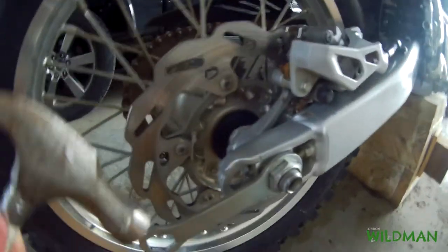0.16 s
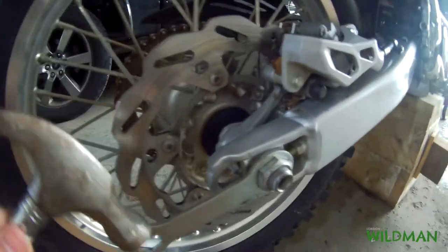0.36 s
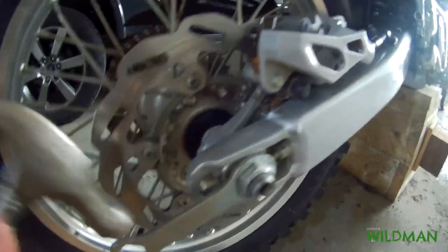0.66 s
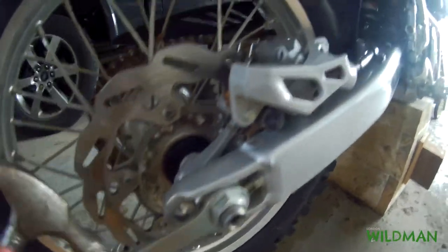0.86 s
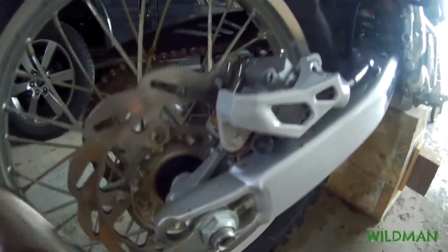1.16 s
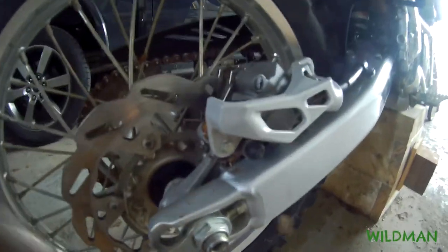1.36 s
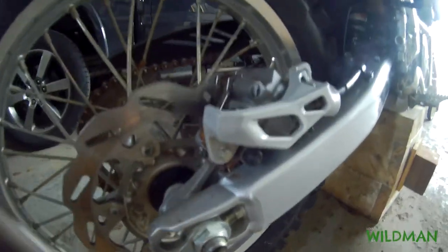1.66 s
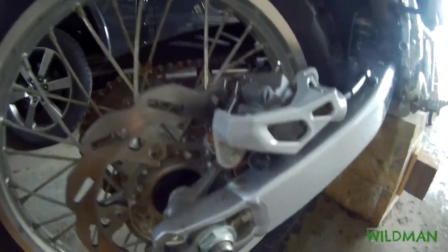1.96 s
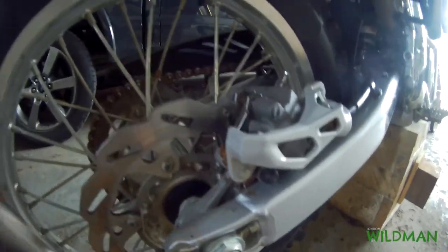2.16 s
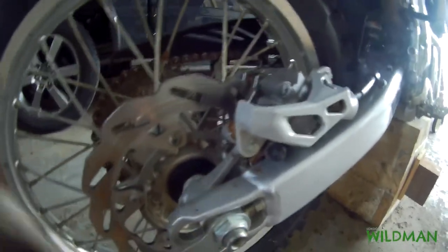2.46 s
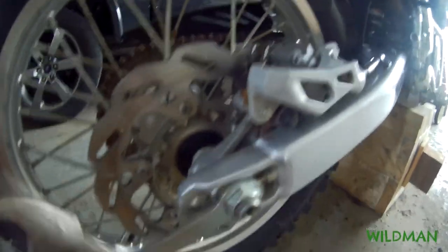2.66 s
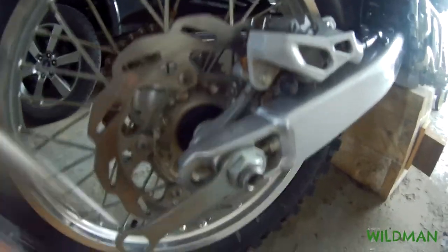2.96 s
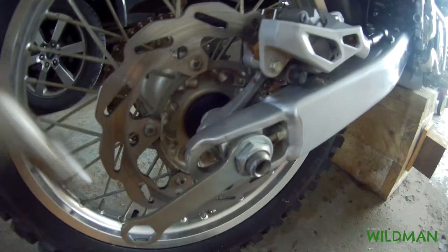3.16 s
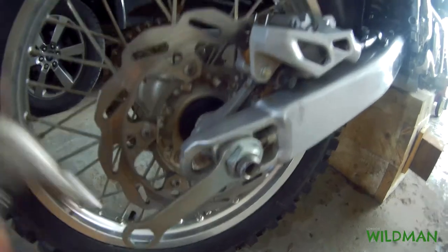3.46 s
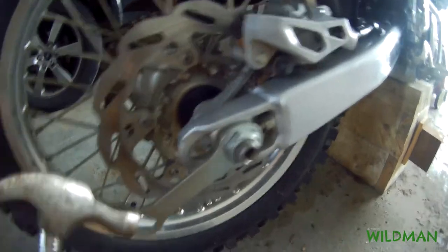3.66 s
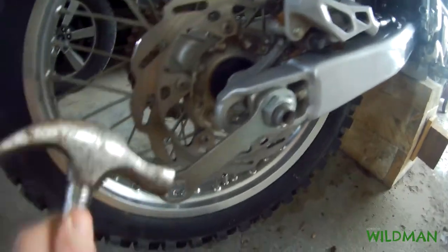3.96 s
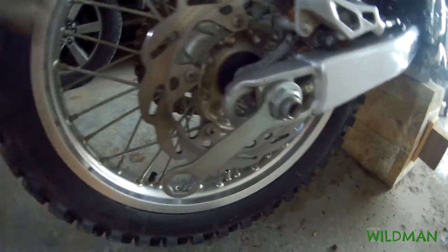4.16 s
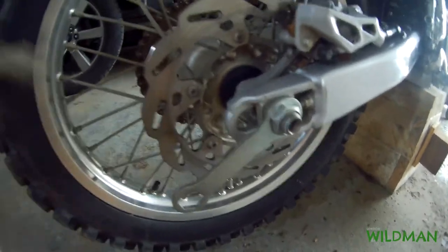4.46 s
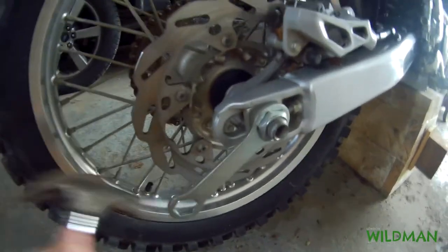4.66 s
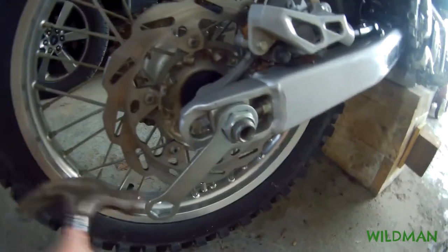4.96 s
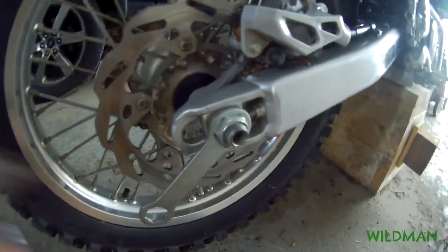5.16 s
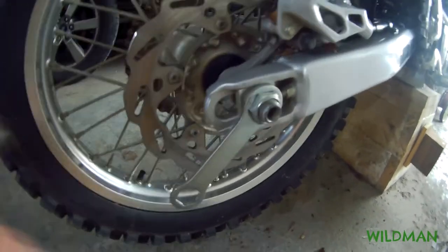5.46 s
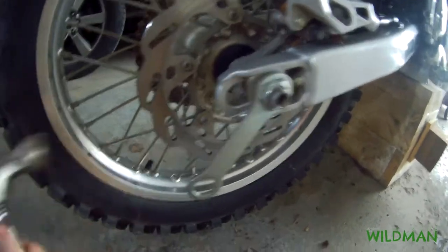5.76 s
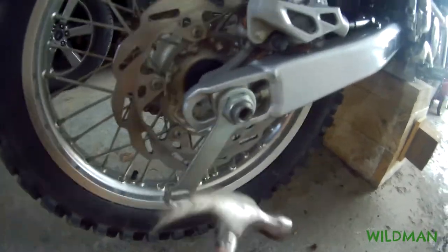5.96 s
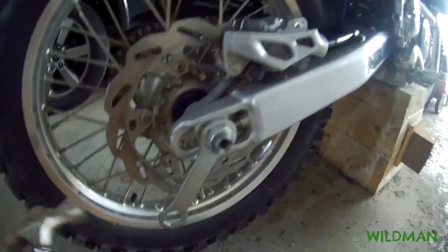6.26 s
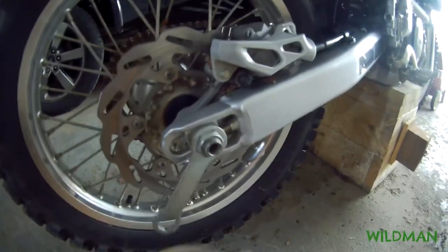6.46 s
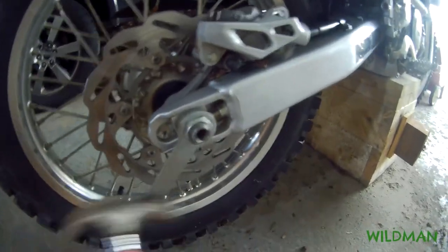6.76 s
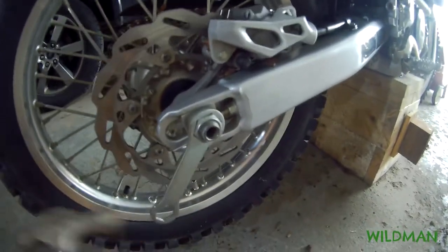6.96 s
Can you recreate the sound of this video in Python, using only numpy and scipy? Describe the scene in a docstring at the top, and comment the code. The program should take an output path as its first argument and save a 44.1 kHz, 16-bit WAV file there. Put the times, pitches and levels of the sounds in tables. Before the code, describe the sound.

In a quiet garage, very close to the microphone, a hammer gives a few light taps, then pounds a motorcycle axle about three times a second. Each blow is a bright steel ping and hard crack with a low thud and short room ring, the loud attacks flattened. Near the end a duller blow frees the axle, followed by two weaker hits, loose steel chinking and a brief rub.

```python
"""A garage, heard close to the work: a hammer drives the rear axle out of a motorcycle.
Each blow is a short steel ping of decaying sines, then a crack of noise through the resonances of
axle, wheel and swingarm, then a knock, a low thud, the ringing frame and the room's noise tail.
Loose steel chinks now and then, mostly near the end, where the axle also slides in its bore.
A faint hush and whine lie beneath; a slow gain control ducks loud attacks and a ceiling flattens them."""
import sys
import numpy as np
from scipy import signal
from scipy.fft import irfft
from scipy.io import wavfile

SR = 44100
rng = np.random.default_rng(int(sys.argv[2]) if len(sys.argv) > 2 else 0)


def log_audio(samples):
    """Write samples as a 16-bit WAV file to the path given in sys.argv[1]."""
    # one column per channel
    frames = np.atleast_2d(samples).T
    # limit to full scale, then quantise
    limited = np.clip(frames, -1, 1)
    pcm = np.round(limited * 32767).astype(np.int16)
    wavfile.write(sys.argv[1], SR, pcm)


N = 312713  # length in samples
AGE = np.arange(32768) / SR  # seconds since a sound began
BINS = np.fft.rfftfreq(8192, 1 / SR)  # Hz, the grid for all filter curves


def amp(db):
    """Turns dB into an amplitude factor."""
    return 10 ** (np.asarray(db) / 20)


def unit(x):
    """Scales to rms 1."""
    return x / np.sqrt(np.mean(x ** 2) + 1e-20)


def read(points, hz):
    """Joins (Hz, value) points on a log-frequency axis."""
    point_hz, value = np.transpose(points)
    return np.interp(np.log(hz + 1), np.log(point_hz + 1), value)


def add(mix, start_s, sound):
    """Adds a sound to the mix at its start time."""
    part = mix[round(start_s * SR):][:len(sound)]
    part += sound[:len(part)]


def dying(t, t60_s):
    """Falls by 60 dB in t60_s seconds."""
    return np.exp(-np.log(1000) * t / t60_s)


def colour(x, gain):
    """Causal (minimum-phase) filter with the given gain at BINS."""
    log_gain = np.log(np.r_[gain, gain[-2:0:-1]] + 1e-6)
    taps = np.fft.ifft(np.exp(np.conj(signal.hilbert(log_gain)))).real
    return signal.fftconvolve(x, taps[:len(gain) // 2])[:len(x)]


def ring(modes):
    """Sums decaying sines from rows (pitch_hz, level_db, t60_s)."""
    return sum(amp(level_db) * dying(AGE, t60_s) * np.sin(2 * np.pi * pitch_hz * AGE)
               for pitch_hz, level_db, t60_s in modes)


# spectrum of the quiet background, with a low rumble near 150 Hz: pitch_hz [Hz], level_db [dB, relative]
HUSH_COLOUR = [(25, 0), (60, 0), (150, 3), (240, 0), (350, -7), (780, -4), (1300, -12), (2500, -21),
               (6000, -23), (10000, -21), (16000, -25)]
# faint electronic whine: pitch_hz [Hz], level_db [dB, peak]
WHINE_TONES = [(6850, -72), (13720, -70)]
HUSH_DB = -53.5  # rms


def hush():
    """A quiet background of shaped steady noise with a low rumble, and a thin electronic whine of pure tones."""
    t = np.arange(N) / SR
    whine = sum(amp(level_db) * np.sin(2 * np.pi * pitch_hz * t) for pitch_hz, level_db in WHINE_TONES)
    air = unit(colour(rng.standard_normal(N), amp(read(HUSH_COLOUR, BINS))))
    return amp(HUSH_DB) * air + whine


# how fast the garage dies away: pitch_hz [Hz], t60_s [s]
ROOM_DECAY = [(100, .6), (800, .56), (2000, .52), (4200, .51), (7000, .48), (9500, .43), (12000, .37),
              (16000, .34)]


def room_tail(sustain, build_s=0.0029):
    """Lets a steady sound die away as the garage does, treble first, after a quick build-up."""
    hz, t, bands = signal.stft(sustain, SR, nperseg=256)
    decay = dying(t, read(ROOM_DECAY, hz)[:, None])
    tail = signal.istft(bands * decay, SR)[1][:len(AGE)]
    return tail * (1 - np.exp(-AGE / build_s))


# broad resonances of the bike: pitch_hz [Hz], width_hz [Hz, before narrowing], level_db [dB, relative]
BODY_RESONANCES = [(243, 143, -9), (638, 125, -1.5), (783, 92, 4.5), (1004, 136, 0.5), (1660, 280, -8),
                   (2254, 370, -3.5), (3360, 220, -5), (4070, 330, 0), (4260, 570, 0.5), (4570, 650, -0.5),
                   (5820, 870, 0), (6780, 230, 5.5), (7570, 770, 1), (9226, 254, 7.5), (9600, 550, 6),
                   (11240, 1200, -2.5), (12700, 520, -9), (14300, 1200, -3)]


def body_gain(hollow_hz=3480, hollow_width_hz=190, hollow_db=-6):
    """Broad peaks of axle, wheel and swingarm as one gain curve; a narrow hollow dips the sound near 3.5 kHz."""
    power = 0
    for pitch_hz, width_hz, level_db in BODY_RESONANCES:
        offset = (BINS - pitch_hz) / (0.96 * width_hz)
        power = power + amp(level_db) ** 2 / (1 + offset ** 2) ** 1.42
    hollow = amp(hollow_db * np.exp(-((BINS - hollow_hz) / hollow_width_hz) ** 2))
    return unit(np.sqrt(power) * hollow)


# the axle slides a little in its bore: time_s [s], level_db [dB, rms of the rub at that moment]
SLIDE_LEVEL = [(6.55, -49), (6.62, -39), (6.695, -37), (6.73, -57), (6.8, -55)]


def slide():
    """Friction noise in the bore stirs the same resonances as the blows."""
    time_s, level_db = np.transpose(SLIDE_LEVEL)
    level = amp(np.interp(np.arange(N) / SR, time_s, level_db, left=-120, right=-120))
    rub_db = read([(200, 11), (600, 5), (930, 9.5), (1300, 10), (4200, -8.5), (9000, -3.5), (14000, 2.5)],
                  BINS)
    return level * unit(colour(rng.standard_normal(N), body_gain() * amp(rub_db)))


# modes of the loose steel: pitch_hz [Hz], level_db [dB, relative], t60_s [s, until it is damped]
STEEL_MODES = [(4829, -6, .2), (8005, -1, .2), (9570, -3, .12), (11050, -1, .15), (13310, -7, .15),
               (14390, -9, .15)]


def chink(level_db, held_s, centre_hz, spread_hz=900, room_db=-45, linger_db=-39):
    """A loose steel piece rings in the air until its next contact damps it; a faint note lingers."""
    modes = []
    for pitch_hz, mode_db, t60_s in STEEL_MODES:
        # modes far from the centre of the ring are weaker
        weight_db = -19 * (1 - np.exp(-((pitch_hz - centre_hz) / spread_hz) ** 2))
        modes.append((pitch_hz, mode_db + weight_db, t60_s))
    tick = amp(-10) * rng.standard_normal(len(AGE)) * dying(AGE, 0.015)
    damping = dying(np.maximum(AGE - held_s, 0), 0.013)
    direct = (ring(modes) + tick) * damping
    linger = ring([(pitch_hz, mode_db, .45) for pitch_hz, mode_db, _ in STEEL_MODES])
    echoes = signal.fftconvolve(direct, room_tail(rng.standard_normal(len(AGE))))[:len(AGE)]
    return amp(level_db) * (direct + amp(linger_db) * linger + amp(room_db) * echoes)


def small_modes(pitches_hz, spread_db=5):
    """The many small parts ring at their own pitches; each blow wakes a different few."""
    size = amp(spread_db * rng.standard_normal(len(pitches_hz)))
    phase = np.exp(2j * np.pi * rng.random(len(pitches_hz)))
    spectrum = np.zeros(len(AGE) // 2 + 1, complex)
    spectrum[(pitches_hz * len(AGE) / SR).astype(int)] = size * phase
    return unit(irfft(spectrum))


def ripple(depth_db=1.5, size=61):
    """No two blows land alike: each favours some resonances over their neighbours."""
    smooth = np.convolve(rng.standard_normal(len(BINS)), np.hanning(size), "same")
    return amp(depth_db * unit(smooth))


# tilt of the blow that frees the axle, lower and duller: pitch_hz [Hz], level_db [dB of change]
FREED_COLOUR = [(800, 2), (2200, 3), (3300, 9), (4300, 5), (4900, 0), (9300, -3)]
FREE_S = 5.96  # the blow that breaks the axle free
WHEEL_DB, AXLE_DB, TREBLE_DB = 0.6, -0.04, -0.5  # added to the shake for each part
GLANCING_ARM_DB = 2.5  # the sideways share of a blow rattles the swingarm


def parts_gain(start_s, aim, shake_db):
    """Shares a blow between wheel (low), swingarm (middle), axle (high) and the treble of the steel."""
    wheel_db, axle_db, treble_db = shake_db + WHEEL_DB, shake_db + AXLE_DB, shake_db + TREBLE_DB
    arm_db = shake_db + GLANCING_ARM_DB * (1 - aim)
    parts_db = read([(700, wheel_db), (1100, wheel_db), (1600, arm_db), (2700, arm_db),
                     (3200, axle_db), (4350, axle_db), (4900, 0), (7800, 0),
                     (9300, treble_db), (12000, 0)], BINS)
    breaks_free = abs(start_s - FREE_S) < .1
    return amp(parts_db + breaks_free * read(FREED_COLOUR, BINS))


# first ping of steel on steel: ratio [multiple of its pitch], level_db [dB, relative],
# t60_s [s, at 0 dB force]
PING_MODES = [(1, -1.5, 0.03), (1.035, -23, 0.02), (.745, -22.5, 0.035)]
GLANCING_PING_HZ, CENTRED_PING_HZ = 9926, 9108  # a well aimed blow pings lower
GLANCING_PING_DB, CENTRED_PING_DB = -8.5, 13  # and louder


def ping(force_db, aim):
    """Steel meets steel: aim sets the pitch and level, and a light tap rings shorter."""
    ping_hz = GLANCING_PING_HZ + aim * (CENTRED_PING_HZ - GLANCING_PING_HZ)
    ping_db = GLANCING_PING_DB + aim * (CENTRED_PING_DB - GLANCING_PING_DB)
    shorter = amp(0.15 * force_db)
    return amp(ping_db) * ring([(ping_hz * ratio, level_db, t60_s * shorter)
                                for ratio, level_db, t60_s in PING_MODES])


# colour of the direct crack against that of the room: pitch_hz [Hz], level_db [dB]
CRACK_COLOUR = [(60, -11), (300, 1), (800, -7.5), (1400, -3.5), (4200, -2.5), (7000, 0), (9500, 0.5),
                (12400, 1.5), (13400, -24.5), (16000, -17.5)]


def crack(force_db, jolt_s):
    """A noise burst, weak until the axle takes up its play, then dying faster for light blows."""
    swell = np.where(AGE < jolt_s, .3, 1) * dying(np.maximum(AGE - jolt_s, 0), 0.051 * amp(0.36 * force_db))
    # loose parts fall back into place with a few small ticks, the later the weaker
    for late_s in rng.uniform(0.015, 0.04, size=3):
        tick = (AGE > late_s) * dying(abs(AGE - late_s), 0.025) * dying(late_s, 0.16)
        swell = swell + amp(-12.5 + .4 * force_db) * tick
    return colour(rng.standard_normal(len(AGE)) * swell, amp(read(CRACK_COLOUR, BINS)))


# slow modes of frame, spokes and brake disc: pitch_hz [Hz, nominal], level_db [dB, nominal], t60_s [s]
FRAME_MODES = [(42, -34, 0.61), (98.2, -30, 0.24), (248, -33, 0.43), (283, -31.5, 0.38),
               (393.4, -33.5, 0.54), (437, -27, 0.23), (568, -32, 0.44), (586, -27, 0.35), (674, -25, 0.39),
               (738, -34, 0.35), (788, -24, 0.26), (818, -27, 0.33), (838, -30.5, 0.59), (960, -28, 0.44),
               (1008, -29, 0.4), (1068, -30.5, 0.47), (1634, -39, 0.69), (1915, -36.5, 0.64),
               (2310, -36, 0.35), (4060, -36, 0.23), (4210, -34, 0.17), (4850, -28, 0.4),
               (6260, -34.5, 0.17), (9900, -33, 0.33)]


def frame_ring():
    """Frame, spokes and disc ring on, each mode slightly off in pitch and level at every blow."""
    modes = [(pitch_hz * (1 + .002 * rng.standard_normal()), level_db + 3 * rng.standard_normal(), t60_s)
             for pitch_hz, level_db, t60_s in FRAME_MODES]
    return ring(modes) * (1 - np.exp(-AGE / .004))


def thud():
    """One low push through the tyre and the stand."""
    u = (AGE - .0052) / 0.0025
    return (1 - 0.73 * u ** 2) * np.exp(-u ** 2 / 2)


# short hollow knock of the swingarm: pitch_hz [Hz], level_db [dB, before force and shake], t60_s [s]
KNOCK_MODES = [(788.6, -5, 0.087), (634, -21, 0.074), (2325, -10, 0.056)]
JOLT_S, JOLT_GROWTH = 0.0022, 0.85  # s of axle travel at 0 dB force; dB of travel time per dB of force
CENTRED_THUD_DB = -3.5  # only the square share of a blow pushes the bike on its stand
FRAME_SHARE = 0.7  # dB of frame ring and knock per dB of wheel shake


def blow(mix, pitches_hz, start_s, force_db, aim, shake_db):
    """Steel pings at contact; a moment later the whole assembly cracks, thuds and fills the room."""
    jolt_s = JOLT_S * amp(JOLT_GROWTH * force_db)
    force = amp(force_db)
    shake = amp(FRAME_SHARE * (shake_db + WHEEL_DB))
    gain = body_gain() * parts_gain(start_s, aim, shake_db) * ripple()
    add(mix, start_s, ping(force_db, aim))
    direct = amp(12.5 - 0.29 * force_db) * crack(force_db, jolt_s)
    sustain = amp(-5.5) * rng.standard_normal(len(AGE)) + amp(-15.5) * small_modes(pitches_hz)
    add(mix, start_s, force * colour(direct + room_tail(sustain), gain))
    add(mix, start_s + jolt_s, force * shake * ring(KNOCK_MODES))
    add(mix, start_s, force * (aim * amp(CENTRED_THUD_DB) * thud() + shake * frame_ring()))


# chinks of loose steel: start_s [s], level_db [dB], held_s [s until damped], centre_hz [Hz, of the ring]
CHINK_EVENTS = [(1.206, -7, .008, 13300), (5.686, -8, .012, 11400), (6.4455, 0, .017, 10100),
                (6.449, -7, .014, 8100), (6.454, -12, .010, 13700), (6.8376, 9, .012, 9650),
                (6.8497, -2, .008, 8100), (6.8502, -2, .008, 11200), (6.857, 0, .003, 12200)]
# hammer blows: start_s [s], force_db [dB], aim [0 glancing to 1 dead centre],
# shake_db [dB, of the whole assembly]
HAMMER_BLOWS = [(0.449, -27.5, .04, 2), (0.6462, -18.5, 0.76, 5.5), (0.893, -11.5, 0.54, 2),
                (1.1728, -4, .48, -2.5), (1.4731, -1.5, 0.93, -3), (1.7887, -2.5, 0.48, -1),
                (2.1236, -4, 0.66, 1.1), (2.4376, -1.5, 0.52, 0.5), (2.765, -2.5, 0.87, 1),
                (3.09, -1, 0.93, -1), (3.4057, -1.5, 1, -1), (3.711, -1.5, 0.9, 0),
                (4.0085, -1.5, 0.7, -0.5), (4.3114, -3, 0.88, 2.5), (4.6247, -2.5, 0.26, 1),
                (4.9507, -3, 0.54, 3), (5.2763, -2, 0.12, 0.5), (5.5963, -3, 0.51, 1),
                (5.9597, -9, 0.41, 3), (6.4448, -17, .03, 1), (6.808, -10, .03, 0.5)]


def scene():
    """Lays the hush and the sliding axle down first, then the blows and chinks."""
    mix = hush() + slide()
    pitches_hz = np.linspace(1200, 15500, 170) + rng.uniform(-40, 40, 170)  # of the small parts
    for event in HAMMER_BLOWS:
        blow(mix, pitches_hz, *event)
    for start_s, *settings in CHINK_EVENTS:
        add(mix, start_s, chink(*settings))
    return mix[None]


CEILING, EDGE_HZ = .64, 15850  # converter's peak amplitude; upper edge of its band
ATTACK_S = 0.00049  # of the gain control


def record(dry, knee_db=-4, recover_db_per_s=88):
    """Gain control ducks a little too late, so loud attacks hit the ceiling; then it slowly recovers."""
    x = dry[0]
    power = signal.lfilter(np.ones(64) / 64, 1, x ** 2)
    over_db = np.maximum(10 * np.log10(abs(power) + 1e-12) - knee_db, 0)
    # hold each peak, letting it fall at a steady rate
    fall_db = np.arange(N) * recover_db_per_s / SR
    held_db = np.maximum.accumulate(over_db + fall_db) - fall_db
    smoothing = np.exp(-1 / (ATTACK_S * SR))
    duck_db = signal.lfilter([1 - smoothing], [1, -smoothing], held_db)
    ducked = x / amp(duck_db)
    # flatten peaks at three times the sample rate to limit aliasing
    fine = signal.resample_poly(ducked, 3, 1)
    flattened = signal.resample_poly(np.clip(fine, -CEILING, CEILING), 1, 3)
    lowpass = signal.firwin(201, EDGE_HZ, window=("kaiser", 8), fs=SR)
    return signal.oaconvolve(flattened, lowpass, "same")[None]


dry = scene()
out = record(dry)
log_audio(out)
```